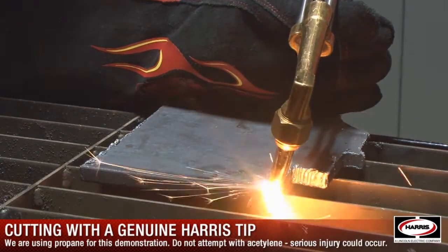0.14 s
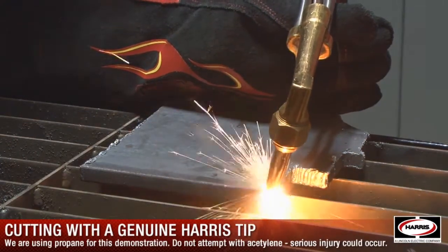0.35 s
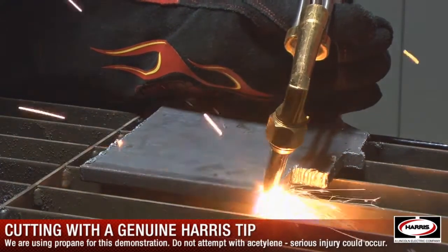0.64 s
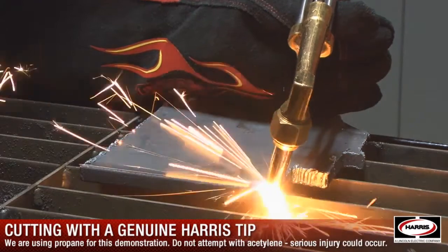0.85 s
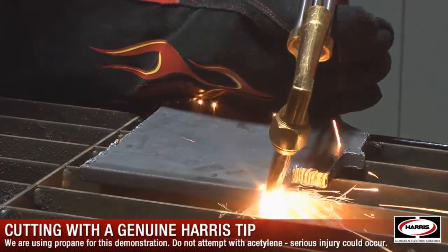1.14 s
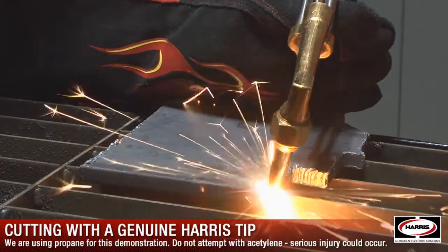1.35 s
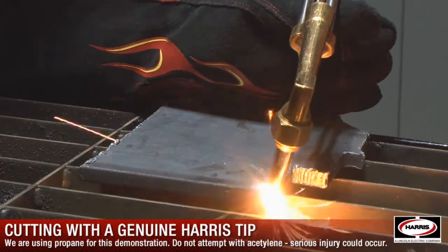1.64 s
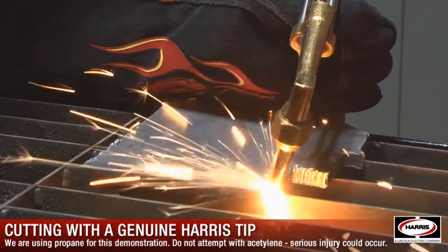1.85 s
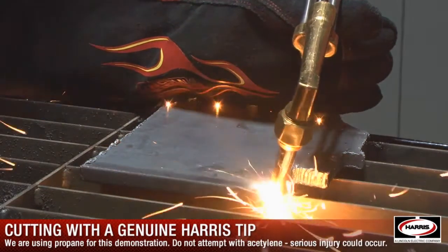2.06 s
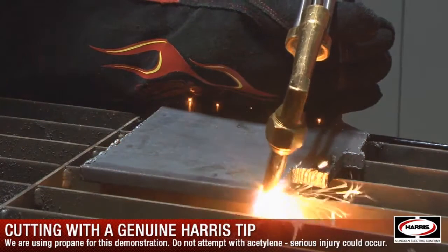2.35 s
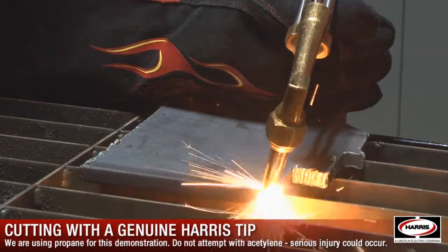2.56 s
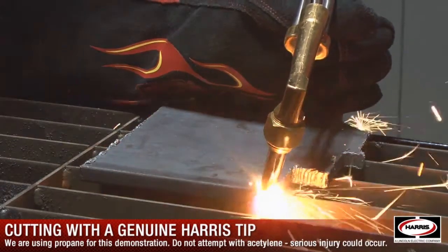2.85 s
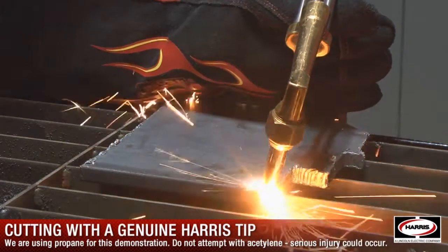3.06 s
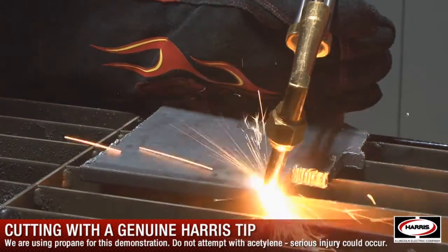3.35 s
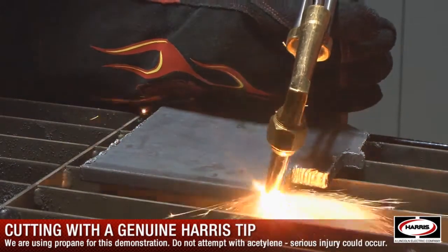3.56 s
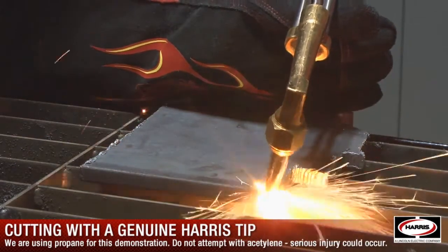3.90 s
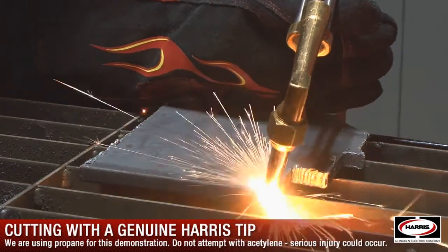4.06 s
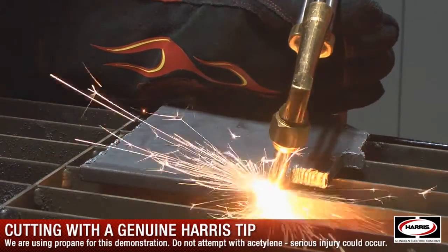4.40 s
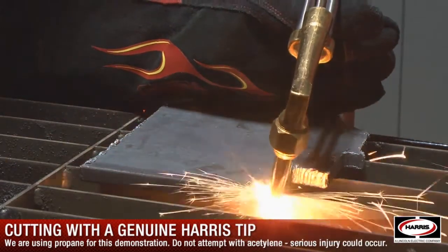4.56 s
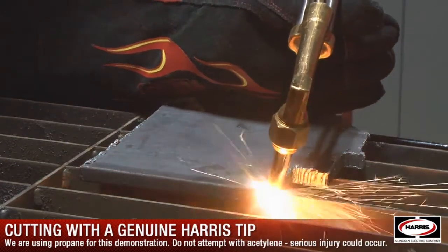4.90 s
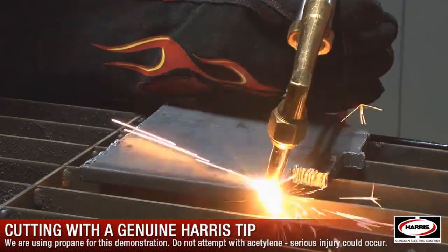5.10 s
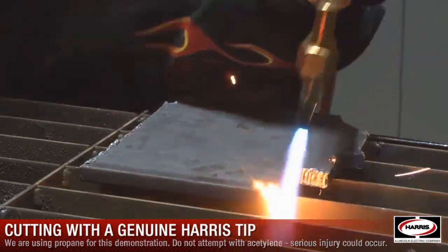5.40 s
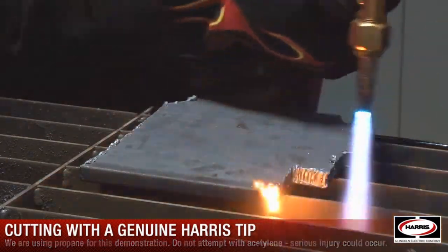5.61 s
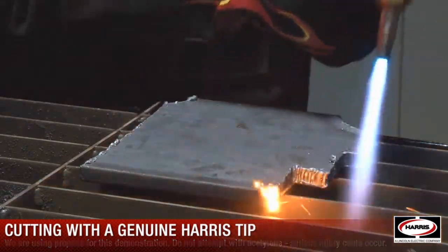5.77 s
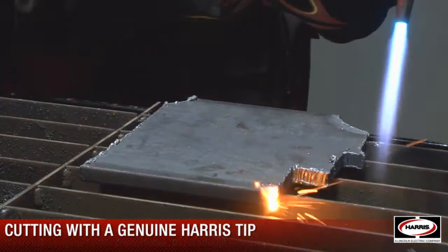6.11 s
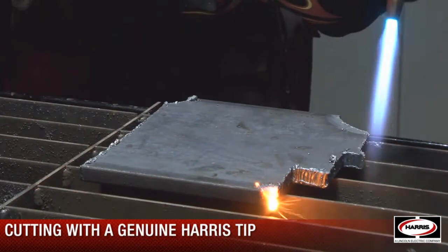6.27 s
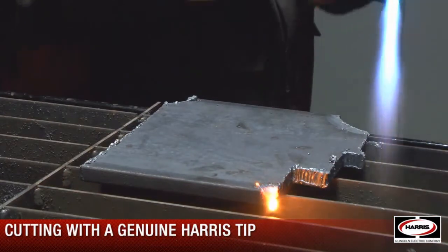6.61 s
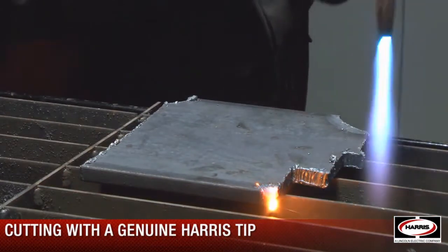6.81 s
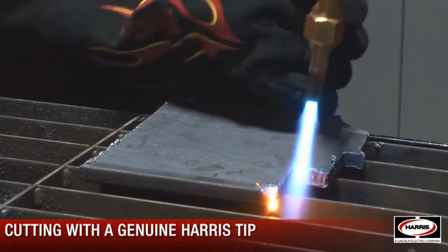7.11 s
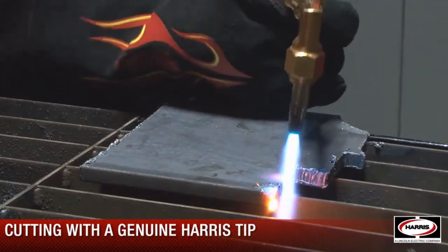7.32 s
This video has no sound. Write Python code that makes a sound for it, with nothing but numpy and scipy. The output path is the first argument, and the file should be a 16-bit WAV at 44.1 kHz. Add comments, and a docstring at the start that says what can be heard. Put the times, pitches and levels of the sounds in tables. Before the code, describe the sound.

A cutting torch hisses and sizzles harshly through steel with squeals and popping slag, then lifts into a steady flame roar with a thin wavering whistle.

```python
"""Harsh hiss and sizzle, with squeals, shrieks and pops, then a roar with a thin, wavering whistle.
An oxy-fuel torch cuts steel plate on a workshop grate, close by, then is lifted clear and burns free.
Jet, rush and flame are banded noise with eddies; edge tones and shrieks are noise bands along a glide.
Slag pops are short pressure pulses that choke or boost the jet; the whistle is a tone that frays.
A buzz of melt, a faint machine hum and short wall reflections complete the scene."""
import sys
import numpy as np
from scipy import signal
from scipy.io import wavfile
from scipy.ndimage import uniform_filter1d

SR = 44100
rng = np.random.default_rng(int(sys.argv[2]) if len(sys.argv) > 2 else 0)


def store_wav(level_fs):
    """Save 16-bit WAV to argv[1]."""
    pcm = np.round(np.clip(np.atleast_2d(level_fs), -1, 1) * 32767)
    wavfile.write(sys.argv[1], SR, pcm.T.astype(np.int16))


N = 328545
TIME = np.arange(N) / SR

# oxygen bursts into open air: start/s, end/s, level/dB
OXYGEN_BURSTS = [(6.221, 6.454, -34), (6.496, 6.705, -35.5)]
# slag pops: t/s, push before trim/dB, puff length/ms, jet choke before shares/dB (negative boosts),
# gurgle re push/dB
SLAG_POPS = [(0.301, -33.5, 7.5, 6, -2), (.596, -33.5, 1.1, 2, 12), (0.612, -37, 6.4, 2, -5),
             (.647, -35, 3.4, 0, -3), (.69, -36, 3, 5, -8), (0.704, -31, 5, 4, -9), (.732, -33, 1, 4, -6),
             (.925, -34, 6.8, 22, -11), (1.063, -34, 5.5, 0, -13), (1.493, -33.5, 5.2, 0, -7),
             (1.557, -34.5, 2, -3.5, -1), (1.739, -29.5, 1.5, 1, 0), (1.742, -29, 1.3, -1.5, -2),
             (1.826, -40, 1.7, 1.5, 16), (2.36, -49, 3, 6, -5), (2.719, -31.5, 5, 11, -3),
             (2.748, -40, 2.2, 1.5, -2), (2.773, -29.5, 4.8, 6, -6), (2.795, -36, 3, -5.5, 1),
             (2.813, -33, 2.8, 4.5, -8), (2.889, -39, 1, 5, 0), (2.9, -30.5, 1.2, 6, -2),
             (2.921, -38, 3.3, 6, -5), (3.151, -31, 6.1, 9, -9), (3.164, -30.5, 4.8, 5, -17),
             (3.183, -32, 4.7, 2.5, -14), (3.257, -28, 7, 10, -11), (3.288, -27.5, 7.4, 11, -9),
             (3.441, -38, 6.6, -4, 6), (3.449, -27, 8, 16, -16), (3.469, -37, 7, 13, -5),
             (3.497, -35, 5, 2, -10), (3.517, -28.5, 6.5, 8, -11), (3.634, -40, 3.1, -4, 0),
             (3.7596, -26, 5.6, 14, -11), (3.778, -31, 5.4, 1, -11), (3.8, -31, 5.1, 3.5, -14),
             (3.955, -29.5, 13, 7, -5), (4.289, -34.5, 5.8, -1, -12), (5.172, -39, 4, -5.5, -6)]
# edge tones of the jet: start/s, end/s, start f/Hz, end f/Hz, width/Hz, level before trim/dB
EDGE_TONES = [(0.385, 0.435, 3200, 2970, 190, -45), (0.621, .66, 2320, 2120, 130, -44.5),
              (0.792, 0.886, 6730, 9840, 700, -35), (1.066, 1.096, 3200, 3400, 190, -45),
              (1.235, 1.309, 4580, 5850, 200, -36), (1.332, 1.387, 1746, 1610, 150, -48),
              (1.7, 1.78, 3050, 2460, 160, -48), (2.055, 2.107, 1640, 1735, 220, -48),
              (2.33, 2.358, 1620, 1650, 130, -42.5), (2.525, 2.611, 4650, 4830, 300, -36.5),
              (2.595, 2.672, 5100, 7770, 480, -34), (2.843, 2.893, 2200, 2140, 130, -46),
              (3.006, 3.058, 5600, 6540, 550, -37), (3.21, 3.269, 2590, 1970, 200, -43),
              (3.213, 3.263, 4900, 3920, 300, -41.5), (3.934, 3.98, 2020, 2220, 220, -47),
              (4.238, 4.272, 2960, 2780, 120, -41), (4.28, 4.308, 2910, 3350, 140, -47)]
# shrieks in the narrow cut: start/s, end/s, spray before trim/dB, tone re spray before trims/dB
CUT_SHRIEKS = [(0.085, .31, -36, -14), (0.877, 0.932, -39, -2), (0.962, 1.068, -35.5, -20),
               (1.297, 1.548, -38.5, -17), (1.78, 1.92, -33.5, -6), (1.88, 2.02, -39, -2),
               (2.052, 2.155, -35.5, 0), (2.312, 2.366, -35, -7), (2.657, 2.74, -46, 3),
               (3.06, 3.155, -40, -14), (3.36, 3.43, -54, 5), (3.703, 3.77, -49, 10),
               (3.907, 3.968, -38, -15), (4.036, 4.146, -39, -5), (4.886, 5.008, -36, 2),
               (5.23, 5.327, -33.5, -0.5)]


def from_db(db):
    """Decibels to gain."""
    return 10 ** (np.asarray(db) / 20)


def rms_one(x):
    """Scale to unit power."""
    return x / np.sqrt(np.mean(x ** 2) + 1e-20)


def in_time(rows):
    """Each column of a curve at every sample."""
    s, *columns = np.transpose(rows)
    return [np.interp(TIME, s, c) for c in columns]


def gate(start_s, end_s, edge_s):
    """One between start and end, with straight ramps centred on both."""
    return np.clip(np.minimum(TIME - start_s, end_s - TIME) / edge_s + .5, 0, 1)


def arch(start_s, end_s):
    """A smooth swell from start to end with a level top."""
    ramp_s = .3 * (end_s - start_s)
    ramp = np.clip(np.minimum(TIME - start_s, end_s - TIME) / ramp_s, 0, 1)
    return np.sin(np.pi / 2 * ramp) ** 2


def cut(x, hz, kind, order=2):
    """Butterworth filter."""
    sos = signal.butter(order, np.minimum(hz, .48 * SR), kind, fs=SR, output="sos")
    return signal.sosfilt(sos, x + 1e-18)


def drift(rate_hz, size=N):
    """Smooth random curve, rms 1: noise through a double pole at rate_hz, made at SR / 8."""
    r = np.exp(-16 * np.pi * rate_hz / SR)
    noise = rng.standard_normal(size // 8 + 3002)
    slow = signal.lfilter([1], [1, -2 * r, r * r], noise)[3000:]   # drop the settling
    return np.interp(np.arange(size) / 8, np.arange(len(slow)), rms_one(slow))


def resonate(x, modes, wander, swell_db, rate_hz):
    """Each air resonance lifts its own narrow band, straying in pitch and strength as the gas swirls."""
    for hz, width_hz, boost_db in modes:
        r = np.exp(-np.pi * width_hz / SR)
        mode_hz = hz * (1 + wander * drift(rate_hz))
        turn = np.exp(2j * np.pi * np.cumsum(mode_hz) / SR)
        # shift the mode to 0 Hz, low-pass, shift back
        peak = 2 * np.real(turn * signal.lfilter([1 - r], [1, -r], x / turn))
        x = x + (from_db(boost_db + swell_db * drift(rate_hz)) - 1) * peak
    return x


def turbulence(colour, patchy_db, eddy_rate_hz, bright_db=0):
    """Third-octave noise bands, each with its own eddies; rms 1 before bright_db tilts the treble."""
    hz, level_db = np.transpose(colour)
    edges_hz = 50 * 2 ** (np.arange(27) / 3)
    white, plain, tilted = rng.standard_normal((2, N)), 0, 0
    for k, (low_hz, high_hz) in enumerate(zip(edges_hz, edges_hz[1:])):
        if high_hz > hz[0] and low_hz < hz[-1]:
            centre_hz = np.sqrt(low_hz * high_hz)
            band_db = np.interp(np.log(centre_hz), np.log(hz), level_db)
            eddies = from_db(band_db + patchy_db * drift(eddy_rate_hz))
            # neighbours use different noise
            band = cut(white[k % 2], [low_hz, high_hz], "band") * eddies
            plain = plain + band
            tilted = tilted + band * from_db(bright_db * np.interp(centre_hz, [6500, 12000], [0, 1]))
    return tilted / np.std(plain)


def sizzle(per_s, spread_db, low_hz):
    """Tiny sparks burst at random, a few much louder than the rest; rms 1."""
    sizes = from_db(spread_db * np.minimum(rng.exponential(1, N), 4)) * rng.choice([-1, 1], N)
    return rms_one(cut(sizes * (rng.random(N) < per_s / SR), low_hz, "high"))


def airy_tone(hz, width_hz):
    """A narrow band of noise that follows a pitch: two quadrature carriers, each with its own drift."""
    phase = 2 * np.pi * np.cumsum(hz) / SR
    return drift(width_hz, len(hz)) * np.cos(phase) + drift(width_hz, len(hz)) * np.sin(phase)


def workshop(x):
    """Wall reflections: exponentially decaying noise tails, different at each side."""
    t60_s = 0.096
    age = TIME[:SR // 2]
    tails = rng.standard_normal((2, len(age))) * from_db(-60 * age / t60_s) * (age > .003)
    return np.array([signal.fftconvolve(x, h / np.linalg.norm(h))[:N] for h in tails])


def machine_hum():
    """A machine elsewhere in the shop: a faint sine that wavers in pitch and level."""
    # hum: f/Hz, level/dB
    hum_rows = [(693.5, -59)]
    hz, db = hum_rows[0]
    phase = 2 * np.pi * np.cumsum(hz + 5 * drift(14)) / SR
    return from_db(db + 3 * drift(10)) * rms_one(np.sin(phase))


def melt_flutter():
    """A film of melt flaps in the jet for a moment and buzzes: a wavering tone and its octave."""
    # one flutter: start/s, end/s, f/Hz, amplitude of the fundamental/dB
    flutter_row = (1.393, 1.459, 332, -37.5)
    start_s, end_s, hz, db = flutter_row
    phase = 2 * np.pi * np.cumsum(hz * (1 + 0.043 * drift(65))) / SR
    buzz = np.sin(phase) + from_db(-10) * np.sin(2 * phase)
    return from_db(db) * gate(start_s, end_s, .006) * buzz


def slag_pops(sag_s, crack_db, crack_s, snap_db):
    """Each slag bubble puffs out gas: a sharp crack, a sagging push, a closing snap, then a gurgle."""
    afterpop_s, afterpop_db = 0.028, -12   # both scaled by 0.5 to 1.5 at random
    trim_db = -2.0
    out, torn, chance = np.zeros(N), np.zeros(N), rng.random((len(SLAG_POPS), 2))
    age = TIME[:SR // 20]
    puffs = [(s, db, ms, gurgle_db) for s, db, ms, _, gurgle_db in SLAG_POPS]
    # each shakes a smaller bubble loose
    puffs += [(s + afterpop_s * (.5 + late), db + afterpop_db * (.5 + weak), ms / 2, gurgle_db)
              for (s, db, ms, gurgle_db), (late, weak) in zip(puffs, chance)]
    for s, db, ms, gurgle_db in puffs:
        length_s = ms / 1000
        push = (age < length_s) * np.exp(-age / sag_s)
        crack = from_db(crack_db) * np.exp(-age / crack_s)
        snap = from_db(snap_db) * np.exp(-np.abs(age - length_s) / crack_s)
        at = slice(int(s * SR), int(s * SR) + len(age))
        out[at] += from_db(db + trim_db) * (push + crack - snap)
        torn[at] += from_db(db + gurgle_db + trim_db) * push
    gurgle_noise = rms_one(cut(rng.standard_normal(N), [170, 650], "band"))
    gurgle = cut(torn, 23, "low", order=1) * gurgle_noise
    return cut(cut(out, 2300, "low"), 11, "high") + gurgle


def frayed_tone(hz, fray_db, jitter, halo_db):
    """A fine line that frays into a noise band and weakens as it breaks up; rms 1 overall."""
    fray_loss_db = 2.5   # approached as noise takes over
    tone = np.sin(2 * np.pi * np.cumsum(hz * (1 + jitter * drift(445))) / SR)
    fray = from_db(fray_db)
    air = fray * airy_tone(hz, width_hz=140) + from_db(halo_db) * airy_tone(hz, width_hz=840)
    loss = from_db(-fray_loss_db * fray ** 2 / (1 + fray ** 2))
    return rms_one((tone + air) / np.hypot(1, fray) * loss)


def whistle(waver, blast_drop, flicker_db, octave_below_db):
    """The nozzle's tone bursts in once the tip is clear and drops in pitch while the oxygen is on."""
    # nozzle tone: t/s, f/Hz, noisy part re tone/dB
    whistle_rows = [(5.404, 3785, 6), (5.42, 3314, -5), (5.49, 3270, -13), (5.555, 3170, -13),
                    (5.62, 3240, -6), (5.68, 3460, -11), (5.755, 3306, -2), (5.778, 3570, -10),
                    (5.812, 3247, -4), (6.03, 3040, -6), (6.1, 3160, -5), (6.19, 3040, -10),
                    (6.275, 3070, 5), (6.36, 3108, -7), (6.425, 3020, -10), (6.48, 3080, 10),
                    (6.53, 3020, -3), (6.86, 3094, -8), (6.97, 3090, 4), (7.11, 2990, -2), (7.2, 3105, -5),
                    (7.305, 3150, -7), (7.34, 2970, -7), (7.45, 3230, -6)]
    level_db, start_s = -33, 5.392
    catch_db, catch_s = 4.5, 0.15   # louder as it catches
    kick_share, kick_db, kick_s = 0.1108, 3, 0.012   # first valve opening flicks pitch and level up
    blast_tone_db = -0.7
    oxygen = sum(gate(start + kick_s, end, 0.011) for start, end, _ in OXYGEN_BURSTS)
    kick = np.exp(-((TIME - OXYGEN_BURSTS[0][0]) / kick_s) ** 2)
    pitch_hz, fray_db = in_time(whistle_rows)
    hz = pitch_hz * (1 + waver * drift(32.3))
    high = frayed_tone(hz * (1 + kick_share * kick), fray_db, jitter=0.014, halo_db=-13.5)
    low = frayed_tone(hz * (1 - blast_drop), fray_db, jitter=0.014, halo_db=-13.5)
    undertone = from_db(octave_below_db) * airy_tone(hz / 2, width_hz=70)
    notes = np.sqrt(1 - oxygen) * (high + undertone) + np.sqrt(oxygen) * from_db(blast_tone_db) * low
    catch = np.exp(-((TIME - start_s) / catch_s) ** 2)
    gain_db = level_db + catch_db * catch + kick_db * kick + flicker_db * drift(19)
    return gate(start_s, np.inf, .012) * from_db(gain_db) * notes


def valve(start_s, end_s):
    """The oxygen lever opens quickly and closes more slowly."""
    open_s, close_s = 0.0089, 0.082
    return np.clip(np.minimum((TIME - start_s) / open_s, (end_s - TIME) / close_s) + .5, 0, 1)


def free_flame():
    """The open flame roars and hisses as turbulent noise; bursts of oxygen add a bright edge."""
    # flame: t/s, roar before trim/dB, hiss re roar before trims/dB
    flame_rows = [(5.39, -36.5, 0), (5.54, -34.5, -1), (5.61, -35.5, -1), (6.2, -33, -5),
                  (6.42, -37.5, -0.5), (6.76, -36.5, -5.5), (6.82, -34, -5.5), (7.21, -32.5, -6.5),
                  (7.45, -35, 1)]
    # spectra of roar, hiss and oxygen: f/Hz, relative density/dB
    roar_colour = [(105, -32), (175, -6), (300, -1.5), (850, -3), (1200, 0), (2200, -1.5), (3200, 2.4),
                   (5000, -12)]
    hiss_colour = [(2300, -6), (3600, 2.5), (5000, 1), (7000, -4), (9500, -10.5), (15000, -17)]
    oxygen_colour = [(5000, 3.5), (7000, 0.5), (9500, -2), (15500, -6)]
    # resonances around the flame: f/Hz, width/Hz, boost/dB
    flame_modes = [(426, 120, 2), (1540, 280, 4.5), (1950, 83, 3)]
    roar_db, hiss_db = in_time(flame_rows)
    roar = turbulence(roar_colour, patchy_db=1.2, eddy_rate_hz=28)
    roar = from_db(roar_db + 0.5) * resonate(roar, flame_modes, wander=0.012, swell_db=1.8, rate_hz=6.1)
    hiss = turbulence(hiss_colour, patchy_db=1.5, eddy_rate_hz=13)
    hiss = from_db(roar_db + hiss_db + 3.0) * hiss
    oxygen = sum(from_db(db) * valve(start, end) for start, end, db in OXYGEN_BURSTS)
    return roar + hiss + oxygen * turbulence(oxygen_colour, patchy_db=2.0, eddy_rate_hz=26)


def squeals(notes, waver):
    """The jet catches an edge and sings a rough, airy gliding note."""
    out = np.zeros(N)
    for start, end, from_hz, to_hz, width_hz, db in notes:
        at = np.flatnonzero((TIME > start) & (TIME < end))
        hz = np.geomspace(from_hz, to_hz, len(at)) * (1 + waver * drift(69, len(at)))
        note = rms_one(airy_tone(hz, width_hz)) * signal.windows.tukey(len(at), .6)
        out[at] += from_db(db + 1.5) * note
    return out


def shrieks():
    """The jet locks into a very high, rough, sinking tone inside a spray of bright hiss."""
    # spectrum of the spray: f/Hz, relative density/dB
    spray_colour = [(7000, -13), (10000, -8), (12700, 1.5), (15500, 1.5)]
    from_hz, to_hz, width_hz = 13300, 12250, 380   # same glide each time
    spray = sum(from_db(db) * arch(start, end) for start, end, db, _ in CUT_SHRIEKS)
    notes = [(start, end, from_hz, to_hz, width_hz, db + tone_db)
             for start, end, db, tone_db in CUT_SHRIEKS]
    spray_noise = turbulence(spray_colour, patchy_db=4.0, eddy_rate_hz=27)
    return from_db(4.0) * spray * spray_noise + squeals(notes, waver=0.014)


def choking():
    """Slag blocks the jet at once and is soon blown clear (dB before shares); negative depths boost it."""
    recover_s = 0.034
    dip_db = sum(depth_db * (TIME > s) * np.exp(-np.minimum(((TIME - s) / recover_s) ** 2, 20))
                 for s, _, _, depth_db, _ in SLAG_POPS)
    return -uniform_filter1d(dip_db, size=64)


def swelling():
    """Slag gathers in the jet before each choking pop and makes it hiss harder (dB)."""
    share, rise_s = 0.078, 0.047
    rise_db = sum(depth_db * (TIME < s) * np.exp(-np.abs(TIME - s) / rise_s)
                  for s, _, _, depth_db, _ in SLAG_POPS if depth_db > 0)
    return share * uniform_filter1d(rise_db, size=64)


def cutting_jet():
    """Sputtering hiss and sparks over a lower, crackling rush, coloured by the air in the cut."""
    # jet: t/s, hiss before trim/dB, treble re hiss before trim/dB, rush under the plate before trim/dB
    jet_rows = [(0.06, -36.5, -4.5, -42), (0.33, -42.5, 6.5, -50), (0.46, -41, -7.5, -46.5),
                (0.6, -40.5, 3.5, -42.5), (1.0, -40, -3.5, -46), (1.12, -39.5, 2, -47.5),
                (1.25, -35.5, -10, -44.5), (1.35, -35.5, 0, -42), (1.55, -40.5, 0.5, -48.5),
                (1.65, -39, -21, -46), (1.75, -38.5, 2, -43), (1.85, -38.5, 3, -46), (2.03, -42, 5, -48.5),
                (2.21, -37.5, -4.5, -46), (2.6, -37, -2.5, -40), (2.72, -37, 3.5, -43.5),
                (2.97, -38.5, -2, -45.5), (3.22, -38, 3.5, -45), (3.33, -42, -2, -47.5),
                (3.55, -37.5, -1, -48), (3.66, -40, -1.5, -43), (3.8, -39.5, -3, -45.5),
                (4.25, -36.5, 0.5, -46), (4.35, -39, -7.5, -46), (4.53, -33, -4, -40.5),
                (5.33, -36.5, -2.5, -41.5)]
    # spectra of hiss and rush: f/Hz, relative density/dB
    hiss_colour = [(2000, -16), (2900, 0.5), (3700, -2.5), (5500, 1), (7000, 0), (15500, -0.9)]
    rush_colour = [(90, -32), (120, -14), (185, -0.5), (330, -1), (780, -3.5), (1060, -5.5), (1660, -2),
                   (2460, -6), (2700, -4.5), (3510, -32), (5940, -120)]
    # air resonances of the cut and the gap under the plate: f/Hz, width/Hz, boost/dB
    cut_modes = [(1650, 91, 5.5), (2230, 63, 3.5), (2742, 39, 7.5), (2890, 43, 3.5), (3320, 82, 2.5),
                 (3620, 46, 3), (4210, 150, 4), (5400, 240, 2), (6840, 410, 2.5)]
    squeal_lift_db, squeal_ref_db = 3.5, -33   # edge tone at ref raises the hiss by lift
    shriek_steal_db, shriek_ref_db = 3, -36.5   # shriek at ref drains the rush by steal
    hiss_choke_share, rush_choke_share, hiss_steal_share = 0.66, 0.42, 0.57
    hiss_db, top_db, rush_db = in_time(jet_rows)
    choke_db, swell_db = choking(), swelling()
    lift_db = squeal_lift_db * sum(from_db(db - squeal_ref_db) * arch(start, end)
                                   for start, end, _, _, _, db in EDGE_TONES)
    steal_db = shriek_steal_db * sum(from_db(db + tone_db - shriek_ref_db) * arch(start, end)
                                     for start, end, db, tone_db in CUT_SHRIEKS)

    bright_db = top_db + 2.2 + 1.8 * swell_db - lift_db   # the lift spares the top treble
    hiss = turbulence(hiss_colour, patchy_db=1.16, eddy_rate_hz=22, bright_db=bright_db)
    sparks = from_db(-14) * sizzle(per_s=2200, spread_db=6, low_hz=3000)
    sputter_db = (0.75 - 0.099 * choke_db) * drift(53)   # rougher while choked
    sputter_db += hiss_choke_share * choke_db + swell_db - hiss_steal_share * steal_db
    jet = cut(hiss + sparks, 2890, "high", order=6)
    jet = jet * from_db(hiss_db + sputter_db + lift_db + 3.5)

    flow_db = rush_db + 1.4 * drift(4.7) + rush_choke_share * choke_db + 0.43 * swell_db - steal_db
    crackle = 2 * from_db(-10) * cut(sizzle(per_s=260, spread_db=5, low_hz=700), 2200, "low")
    rush = turbulence(rush_colour, patchy_db=1.5, eddy_rate_hz=26) + crackle
    rush = cut(from_db(flow_db - 1.8) * rush, 67, "high", order=4)
    return resonate(jet + rush, cut_modes, wander=0.0058, swell_db=1.6, rate_hz=7.9)


def scene():
    """The cut gives way to the free flame as the torch is lifted."""
    lift_start_s, lift_end_s = 5.315, 5.42
    cut_room_db, flame_room_db = -17.5, -21
    bass_lean_db, bass_lean_hz = 0.16, 600   # lows lie a little further left
    lifted = np.clip((TIME - lift_start_s) / (lift_end_s - lift_start_s), 0, 1)
    cutting = cutting_jet() * np.sqrt(1 - lifted) + shrieks() + squeals(EDGE_TONES, waver=0.0223)
    slag = slag_pops(sag_s=0.013, crack_db=-3.5, crack_s=0.0005, snap_db=-9)
    tone = whistle(waver=0.0085, blast_drop=.082, flicker_db=1.6, octave_below_db=-17)
    flame = lifted * free_flame() + tone
    mono = cutting + slag + melt_flutter() + flame + machine_hum()
    room_db = cut_room_db + (flame_room_db - cut_room_db) * lifted
    room = workshop(from_db(room_db) * cut(mono, 90, "high"))
    lows = cut(mono, bass_lean_hz, "low", order=1)
    lean = (from_db(bass_lean_db) - 1) * lows * [[1], [-1]]
    return mono * from_db([[.15], [-.15]]) + lean + room


def record(dry):
    """Steep elliptic low-pass at 15.7 kHz."""
    return signal.sosfilt(signal.ellip(12, .1, 80, 15700, fs=SR, output="sos"), dry)


dry = scene()
out = record(dry)
store_wav(out)
```